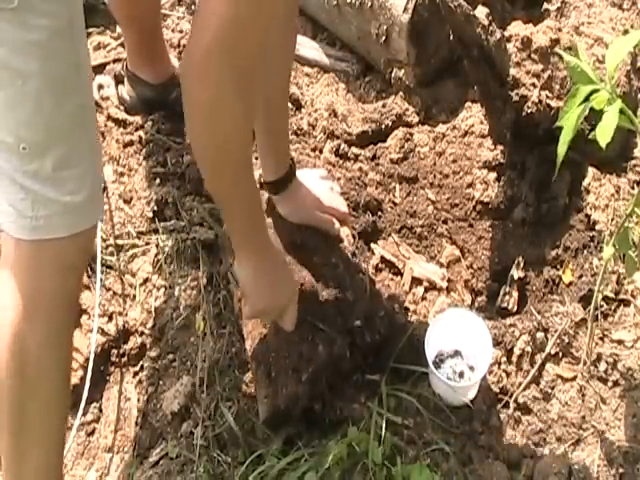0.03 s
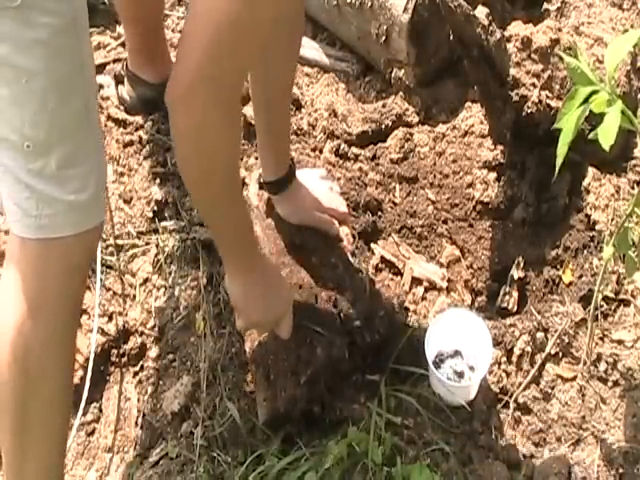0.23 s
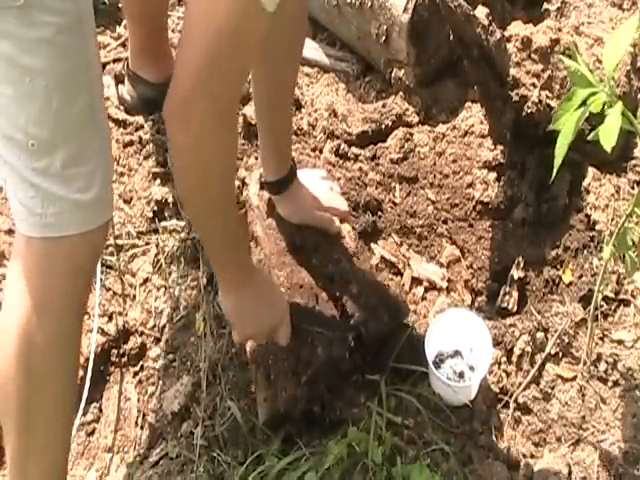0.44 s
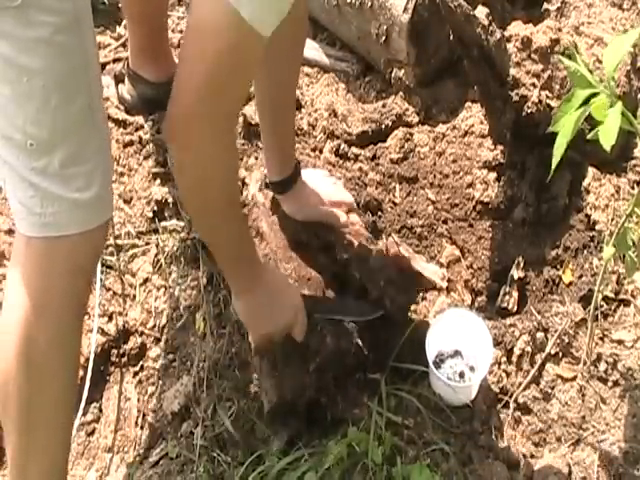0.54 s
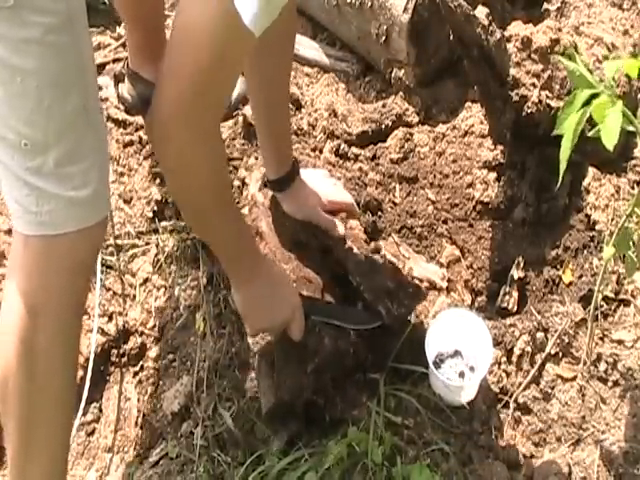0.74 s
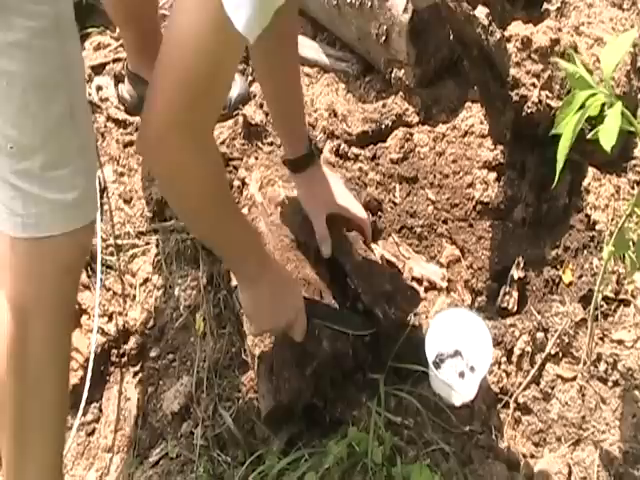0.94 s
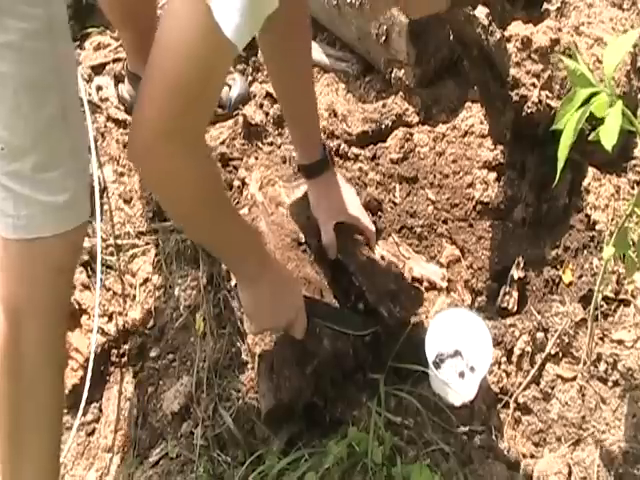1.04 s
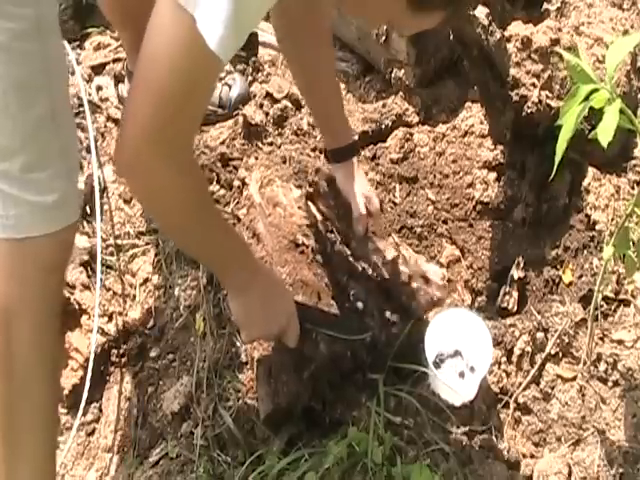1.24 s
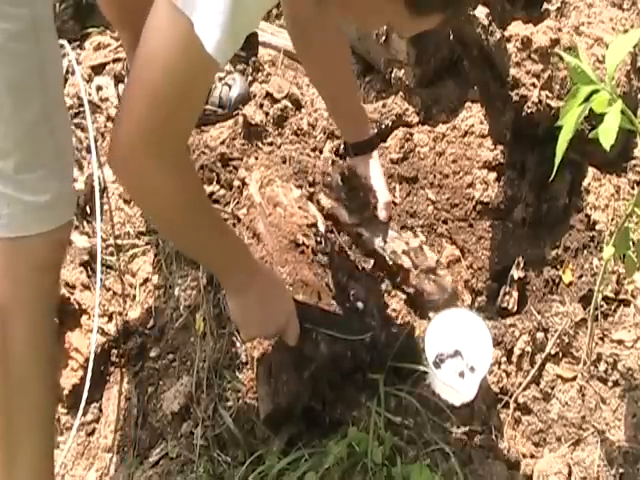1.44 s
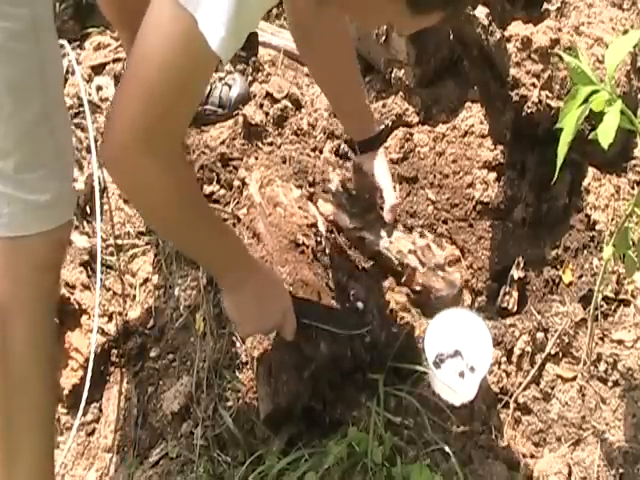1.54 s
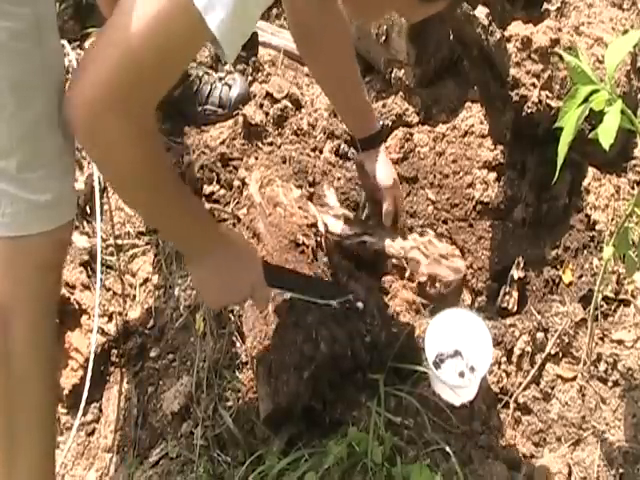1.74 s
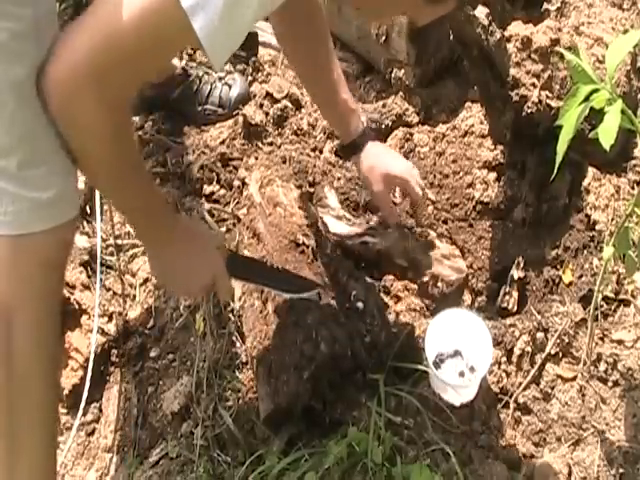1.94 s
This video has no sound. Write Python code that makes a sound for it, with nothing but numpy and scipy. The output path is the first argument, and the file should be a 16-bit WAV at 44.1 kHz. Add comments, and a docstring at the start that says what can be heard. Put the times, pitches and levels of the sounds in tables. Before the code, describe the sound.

Rotten wood snaps and splinters near the microphone, building to one sharp crack and a short crunch, before the piece scrapes faintly over the ground. Around it are rapid high chirps, faint birds, outdoor hiss and light wind buffeting.

```python
"""A rotten log cracks as a blade pries off a slab: fibres snap in a short run up to one loud break,
then crunch and tear, each snap ringing the damp wood. The loose slab slides away over the soil.
Outdoors around it are a low rumble buffeting the microphone, a train of high arched chirps,
a few faint falling bird notes and a steady hiss of air and insects."""
import sys
import numpy as np
from scipy import signal
from scipy.fft import rfft, irfft
from scipy.io import wavfile

SR = 44100
rng = np.random.default_rng(int(sys.argv[2]) if len(sys.argv) > 2 else 0)


def file_out(sig):
    """Save sig as 16-bit WAV at sys.argv[1]."""
    # one column per channel
    cols = np.atleast_2d(sig).T
    # limit, then scale
    lim = np.clip(cols, -1, 1)
    pcm = np.round(lim * 32767).astype(np.int16)
    wavfile.write(sys.argv[1], SR, pcm)


N = 88200
TIME = np.arange(N) / SR
BINS_HZ = np.maximum(np.arange(N // 2 + 1) * SR / N, 1)
RING_SAMPLES = SR // 10

# damp log: (frequency [Hz], level [dB], T60 [s])
LOG_MODES = [(690, -12.5, .013), (1245, -5, .012), (1750, -3, .010), (1980, -7, .009), (3280, -8, .008)]
# splinter spray: (frequency [Hz], relative level [dB])
SPLINTER_EQ = [(300, -22), (900, -12), (1700, -4), (2600, -5), (3400, 0), (7000, -1), (9500, -7),
               (13000, -11), (14400, -26), (16000, -36)]
# fibre breaks: (time [s], knock [dB], snap [dB], snap pitch [Hz], log pitch [ratio], focus [Hz])
BREAKS = [(.1876, -22, -22, 2800, 1.0, 1400), (.1900, -15, -21, 4170, .97, 1200),
          (.2238, -12, -10, 3400, .97, 1200), (.2244, -20, -10, 11500, 1.0, 1500),
          (.2250, -19, -10, 4000, 1.0, 1000), (.2325, -11, -14, 3500, 1.02, 1600),
          (.2551, -27, -15, 8000, 1.0, 1500), (.2570, -22, -16, 7060, 1.0, 1400),
          (.2586, -6, -6, 5500, 1.03, 1600), (.2600, -7, -1, 8200, 1.03, 1750),
          (.2794, -13, -6, 7400, 1.0, 1500), (.2817, -21, -12, 3500, 1.0, 1200),
          (.2835, 10, 7, 3400, 1.0, 1370), (.2842, -7, 6, 5400, 1.0, 1600),
          (.3343, -27, -22, 4500, 1.1, 1700), (.3409, -25, -21, 5000, 1.1, 1500),
          (.3519, -17, -15.5, 4400, 1.05, 1600), (.3662, -18, -22, 3970, .95, 800),
          (.3987, -23, -26, 4800, 1.1, 1900), (.4319, -23, -20, 6500, 1.0, 1700),
          (.4461, -8, -9, 6200, 1.03, 1950), (.4507, -15, -16, 6000, .97, 1700),
          (.4537, -15, -14, 4800, .95, 1600), (.4582, -20, -17, 5200, 1.0, 1800),
          (.4631, -22, -12, 5100, 1.0, 1700), (.4642, -15, -3, 5400, .96, 1800),
          (.4656, -23, -10, 5900, .97, 1700), (.4756, -24, -16, 4200, 1.0, 1200),
          (.4795, -30, -17, 4500, 1.0, 1500), (.4864, -5, 3.5, 3750, 1.12, 600),
          (.4889, -13, -18, 3500, 1.05, 650), (.507, -25, -22, 4500, 1.1, 1300),
          (1.0593, -28, -28, 3800, 1.0, 1900)]
MODE_SPREAD_DB, MODE_DETUNE, OFF_FOCUS_DB_PER_OCT, LOG_HIGHPASS_HZ = 1.0, .01, 9, 600
SNAP_T60_S, SPLINTER_T60_S, SPLINTER_DB = .0016, .008, -15.5

def cracks():
    """Each break snaps and sprays splinters; where it happens decides which log modes ring most."""
    wood, splinters = np.zeros(N), np.zeros(N)
    for time_s, knock_db, snap_db, snap_hz, pitch_ratio, focus_hz in BREAKS:
        knock = np.zeros(RING_SAMPLES)
        for hz, db, t60_s in LOG_MODES:
            spread_db = MODE_SPREAD_DB * rng.standard_normal()
            detune = 1 + MODE_DETUNE * rng.standard_normal()
            off_focus_db = OFF_FOCUS_DB_PER_OCT * abs(np.log2(hz / focus_hz))
            knock += from_db(db + spread_db - off_focus_db) * ring(hz * pitch_ratio * detune, t60_s)
        snap = from_db(snap_db) * ring(snap_hz, SNAP_T60_S)
        add(wood, time_s, from_db(knock_db) * knock + snap)
        spray = decay(SPLINTER_T60_S) * rng.standard_normal(RING_SAMPLES)
        add(splinters, time_s, from_db(snap_db + SPLINTER_DB) * spray)
    return highpass(wood, LOG_HIGHPASS_HZ) + colour(splinters, SPLINTER_EQ)  # small wood: little bass


# whole slab: (frequency [Hz], level [dB], T60 [s])
SLAB_MODES = [(400, -5, .013), (655, -15, .023)]
THUD_DB, THUD_RISE_S = -9.5, .0005

def thud():
    """A low thud from the overloaded loudest crack, with a dull wooden ring."""
    break_s = max(BREAKS, key=lambda row: row[1])[0]
    age = np.maximum(TIME - break_s, 0) / THUD_RISE_S
    out = -from_db(THUD_DB) * age * np.exp(1 - age)
    add(out, break_s, -struck(SLAB_MODES))
    return out


# fine fibres tearing: (start [s], length [s], level [dB])
FIBRE_TEARS = [(0.222, 0.0059, -32), (0.250, .012, -34), (.277, 0.012, -31), (0.325, 0.053, -44),
               (0.442, 0.029, -33.5), (0.472, 0.021, -38), (0.49, 0.034, -48)]
FIBRE_KNOCK_DB = -16

def tearing():
    """Dense tiny breaks crunch between the big ones and ring the same log."""
    effort = sum(from_db(db) * np.sqrt(arch(start_s, length_s)) for start_s, length_s, db in FIBRE_TEARS)
    clicks = effort * grains(rate_per_s=2000, spread_db=3.0)
    log_response = highpass(struck(LOG_MODES), LOG_HIGHPASS_HZ)
    return colour(clicks, SPLINTER_EQ) + from_db(FIBRE_KNOCK_DB) * convolve(clicks, log_response)


# soil friction: (frequency [Hz], relative level [dB])
RUB_EQ = [(200, -21), (600, 0.5), (1000, -1), (1500, -1.5), (2200, -12), (4000, -19), (12000, -48)]
# rubbed slab: (frequency [Hz], relative level [dB], T60 [s])
RUB_MODES = [(614, 0, .022), (969, 0, .025), (1390, -1, .012), (1910, -9, .012)]
RUB_DB, RUB_RING_DB = -44, -45

def slide():
    """The loose slab rubs softly over crumbs of soil, which make it ring."""
    stroke = arch(start_s=.769, length_s=.39)
    crumbs = grains(rate_per_s=3000, spread_db=4.0)
    ringing = unit_rms(convolve(crumbs, struck(RUB_MODES)))
    return stroke * (from_db(RUB_DB) * colour(crumbs, RUB_EQ) + from_db(RUB_RING_DB) * ringing)


NEAR_DB, NEAR_T60_S, SCATTER_DB, SCATTER_T60_S = -11, .0077, -28, .16

def reflections(x):
    """Near reflections widen the treble; soil and plants add a faint short tail."""
    tails = rng.standard_normal((2, RING_SAMPLES)) * decay(SCATTER_T60_S)
    near = rng.standard_normal(RING_SAMPLES) * decay(NEAR_T60_S)
    side = from_db(NEAR_DB) * highpass(convolve(x, near / np.linalg.norm(near)), cutoff_hz=2600)
    scatter = np.array([convolve(x, tail / np.linalg.norm(tail)) for tail in tails])
    return x + np.array([side, -side]) + from_db(SCATTER_DB) * scatter


# soft bumps: (centre [s], level [dB], pitch [Hz])
LOW_BUMPS = [(.075, -38, 55), (.945, -31, 70), (1.002, -26, 105), (1.068, -26, 90), (1.102, -28, 110),
             (1.163, -30, 105), (1.184, -27, 145), (1.312, -35, 180), (1.350, -34, 170), (1.382, -25, 120),
             (1.421, -28, 160), (1.525, -34, 90), (1.930, -34, 65)]
# rumble envelope: (time [s], level [dB])
RUMBLE_LEVELS = [(0, -46), (.10, -46), (.19, -58), (.33, -66), (.74, -69), (.79, -51), (.91, -49),
                 (.96, -39), (1.19, -39), (1.24, -44), (1.38, -38), (1.46, -50), (1.63, -50), (1.75, -50),
                 (1.80, -58), (1.97, -61)]
# rumble spectrum: (frequency [Hz], relative level [dB])
RUMBLE_EQ = [(20, -5), (45, -1), (70, 0), (110, 0), (180, -5), (270, -15), (500, -38), (2000, -80)]
BUMP_HALF_WIDTH_CYCLES = .8

def rumble():
    """Low buffeting at the microphone, with soft bumps of a cycle or two."""
    bumps = np.zeros(N)
    for centre_s, db, hz in LOW_BUMPS:
        cycles = (TIME - centre_s) * hz
        bumps += from_db(db) * gaussian(cycles / BUMP_HALF_WIDTH_CYCLES) * np.sin(2 * np.pi * cycles)
    envelope = from_db(np.interp(TIME, *np.transpose(RUMBLE_LEVELS)))
    return bumps + envelope * stereo_noise(from_db(at_bins(RUMBLE_EQ)), correlation=.75)


# chirp train: (centre [s], level [dB], top pitch [Hz])
HIGH_CHIRPS = [(.045, -32, 8040), (.099, -30, 8060), (.154, -30, 8080), (.208, -30, 8080),
               (.262, -30, 8100), (.315, -32, 8080), (.371, -31, 8030), (.425, -30, 8090),
               (.481, -31, 8080), (.537, -31, 8020), (.593, -32, 7990), (.649, -31, 8010),
               (.704, -31, 8010), (.760, -31, 7990), (.817, -31, 8000), (.872, -34, 7860),
               (.989, -35, 7740), (1.089, -33, 7900), (1.149, -33, 7880), (1.205, -32, 7940),
               (1.268, -33, 7890), (1.334, -31, 7930), (1.439, -31, 7930), (1.587, -34, 7860),
               (1.704, -34, 7850), (1.755, -34, 7870), (1.804, -34, 7860), (1.860, -34, 7900),
               (1.914, -33, 7930), (1.967, -34, 7840)]
CHIRP_HALF_WIDTH_S, CHIRP_TOP_LEAD_S, CHIRP_SAG_HZ = .0092, .00202, 360

def chirps():
    """Pure tones whose pitch arches up and drops away."""
    out = np.zeros(N)
    for centre_s, db, top_hz in HIGH_CHIRPS:
        t = TIME - centre_s
        from_top = (t + CHIRP_TOP_LEAD_S) / CHIRP_HALF_WIDTH_S
        hz = top_hz - CHIRP_SAG_HZ * np.minimum(from_top ** 2, 10)
        swell = gaussian((t / CHIRP_HALF_WIDTH_S) ** 2)  # flat-topped
        out += from_db(db) * np.sqrt(2) * swell * np.sin(2 * np.pi * np.cumsum(hz) / SR)
    return panned(out, pan_db=-3.2)


# falling notes: (centre [s], level [dB], pitch [Hz], left minus right [dB])
BIRD_NOTES = [(.001, -32, 4440, 9), (.046, -38, 4030, -5), (.389, -42, 3910, -5), (.623, -32, 4460, 8),
              (.690, -45, 3820, -2), (.738, -39, 3940, -7), (1.039, -31, 4490, 8), (1.135, -42, 3920, -7),
              (1.295, -39, 4380, 8), (1.333, -32, 4470, 8), (1.595, -40, 4400, 7), (1.688, -41, 3930, -4),
              (1.840, -36, 4540, 8)]
NOTE_HALF_WIDTH_S, NOTE_FALL_HZ_PER_S, FLUTTER_HZ, FLUTTER_DEPTH = .0098, 16000, 260, .2

def birds():
    """Short, slightly rough whistles that slide downward, from two places."""
    out = np.zeros((2, N))
    lowpass = signal.butter(2, FLUTTER_HZ, fs=SR, output="sos")
    for centre_s, db, hz, pan_db in BIRD_NOTES:
        t = TIME - centre_s
        swell = gaussian(t / NOTE_HALF_WIDTH_S)
        flutter = 1 + FLUTTER_DEPTH * unit_rms(signal.sosfilt(lowpass, rng.standard_normal(N)))
        tone = np.sqrt(2) * np.sin(2 * np.pi * t * (hz - NOTE_FALL_HZ_PER_S * t / 2))
        out += panned(from_db(db) * swell * flutter * tone, pan_db)
    return out


# air and insect hiss: (frequency [Hz], relative level [dB])
HISS_EQ = [(20, -12), (120, -4.5), (260, -2.5), (600, 0.5), (1100, -2), (2000, -4.5), (2900, -5.5),
           (3800, -3), (4800, 0.5), (5400, -3), (6100, -2.5), (6700, 0.5), (7600, 0), (8200, -6),
           (9000, -14), (10400, -22), (13200, -25.5), (14100, -55)]
# stereo image: (frequency [Hz], left-right correlation [ratio])
HISS_CORRELATION = [(100, 0.96), (1000, 0.64), (2500, 0.35), (5000, .5), (8000, 0.18), (11000, 0.05)]
# far insects: (frequency [Hz], half-width [Hz], level [dB])
INSECT_DRONES = [(3550, 22, -55.5), (3878, 40, -53.5), (5970, 29, -55)]
HISS_DB = -39

def air_and_insects():
    """Steady hiss of air and far insects, with a few thin drones."""
    correlation = at_bins(HISS_CORRELATION)
    drones = np.zeros((2, N))
    for hz, half_width_hz, db in INSECT_DRONES:
        band = 1 / (1 + ((BINS_HZ - hz) / half_width_hz) ** 2)
        drones += from_db(db) * stereo_noise(band, correlation)
    return from_db(HISS_DB) * stereo_noise(from_db(at_bins(HISS_EQ)), correlation) + drones


def from_db(db):
    """Decibels to gain."""
    return 10 ** (np.asarray(db) / 20)


def unit_rms(x):
    """Scale to unit power."""
    return x / np.sqrt(np.mean(x ** 2) + 1e-20)


def at_bins(points):
    """Interpolate a table onto the FFT bins, in log frequency."""
    hz, value = np.transpose(points)
    return np.interp(np.log(BINS_HZ), np.log(hz), value)


def colour(x, spectrum):
    """Minimum-phase filter of unit power gain."""
    gain = unit_rms(from_db(at_bins(spectrum)))
    cepstrum = irfft(np.log(gain), N)
    cepstrum[1:N // 2] *= 2
    cepstrum[N // 2 + 1:] = 0
    return irfft(rfft(x) * np.exp(rfft(cepstrum)), N)


def highpass(x, cutoff_hz):
    """Third-order bass cut."""
    return signal.sosfilt(signal.butter(3, cutoff_hz, "high", fs=SR, output="sos"), x)


def convolve(x, response):
    """Convolution cut to scene length."""
    return signal.fftconvolve(x, response)[:N]


def arch(start_s, length_s):
    """Half-sine envelope."""
    return np.sin(np.pi * np.clip((TIME - start_s) / length_s, 0, 1)).clip(0)


def gaussian(x):
    """Bell curve, 1/e at x = 1."""
    return np.exp(-np.minimum(x ** 2, 20))


def decay(t60_s):
    """Exponential decay, 0.1 s long."""
    return np.exp(-np.log(1000) * TIME[:RING_SAMPLES] / t60_s)


def ring(hz, t60_s):
    """One struck mode."""
    return decay(t60_s) * np.sin(2 * np.pi * hz * TIME[:RING_SAMPLES])


def struck(modes):
    """All modes of a body, struck once."""
    return sum(from_db(db) * ring(hz, t60_s) for hz, db, t60_s in modes)


def add(out, time_s, sound):
    """Mix a sound in at its time."""
    start = max(int(time_s * SR), 0)
    out[start:start + len(sound)] += sound[:N - start]


def grains(rate_per_s, spread_db):
    """Random clicks of uneven size, unit RMS."""
    sizes = from_db(spread_db * np.minimum(rng.exponential(1, N), 4))
    hits = rng.random(N) < rate_per_s / SR
    return unit_rms(hits * sizes * rng.choice([-1, 1], N))


def panned(x, pan_db, lead_s_per_db=.00001):
    """Pan by level and arrival time; the louder side leads."""
    sides = zip(np.broadcast_to(x, (2, N)), (pan_db / 2, -pan_db / 2))
    return np.array([from_db(db) * np.interp(TIME + lead_s_per_db * db, TIME, y) for y, db in sides])


def stereo_noise(gain, correlation):
    """Unit-RMS noise with a gain and a left-right correlation per bin."""
    mid, side = rfft(rng.standard_normal((2, N))) * gain
    spectra = np.sqrt(1 + correlation) * mid + np.sqrt(1 - correlation) * np.array([side, -side])
    return unit_rms(irfft(spectra, N))


def scene():
    """The wood close by, the meadow around it."""
    wood = reflections(cracks() + tearing() + slide()) + thud()
    return panned(wood, pan_db=-.6) + chirps() + birds() + air_and_insects() + rumble()


CLIP_LEVEL, CUTOFF_HZ = 1.0, 16300

def record(dry):
    """The loudest break clips; a steep low-pass cuts the top."""
    lowpass = signal.cheby2(12, 70, CUTOFF_HZ, fs=SR, output="sos")
    return signal.sosfilt(lowpass, np.clip(dry, -CLIP_LEVEL, CLIP_LEVEL))


dry = scene()
out = record(dry)
file_out(out)
```